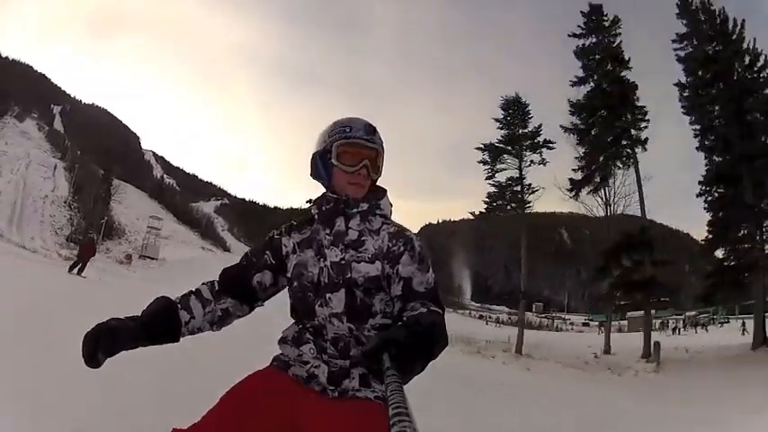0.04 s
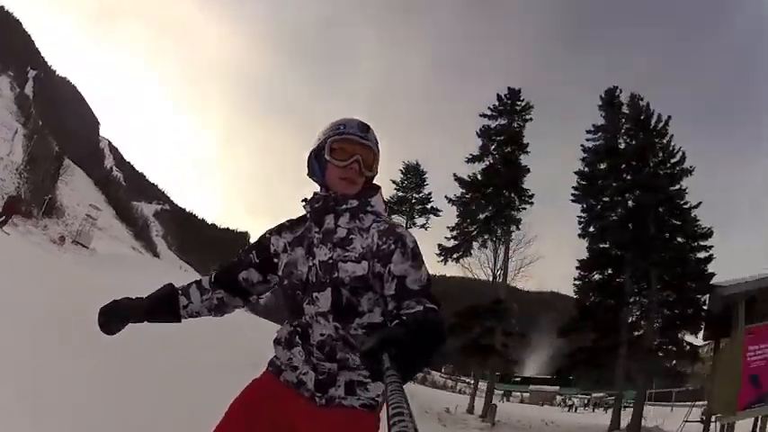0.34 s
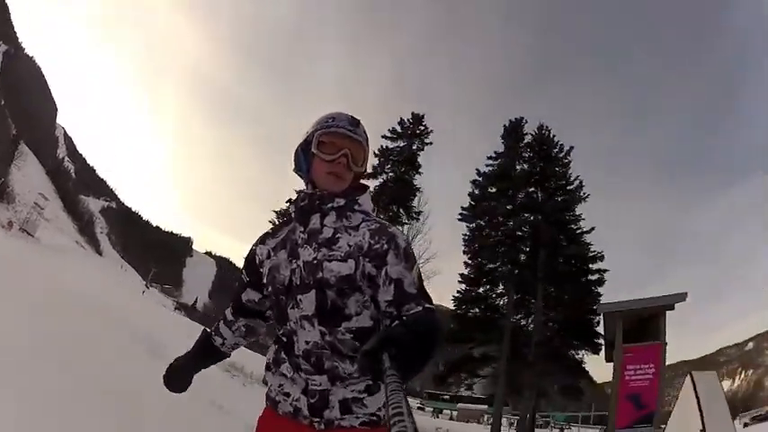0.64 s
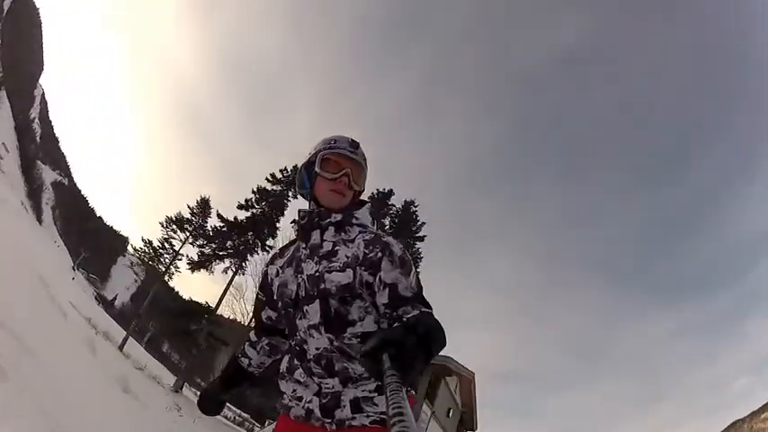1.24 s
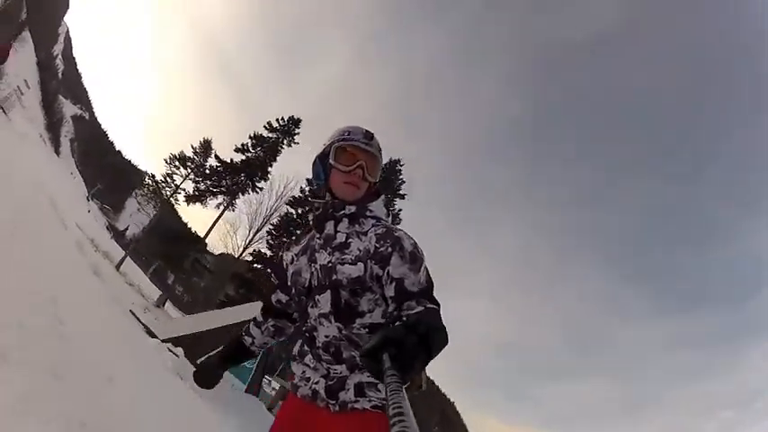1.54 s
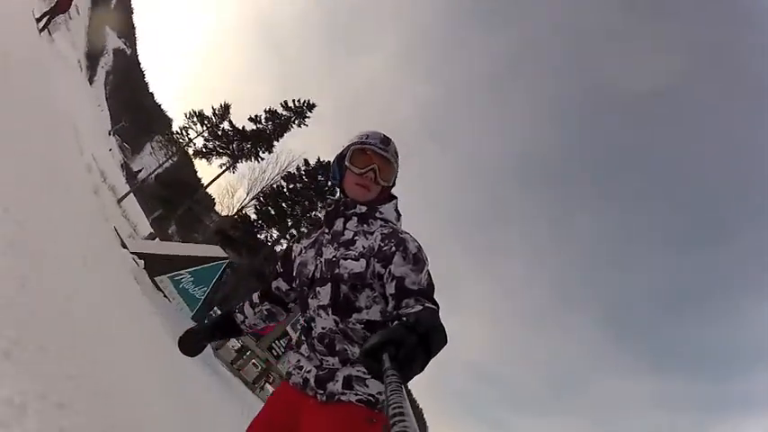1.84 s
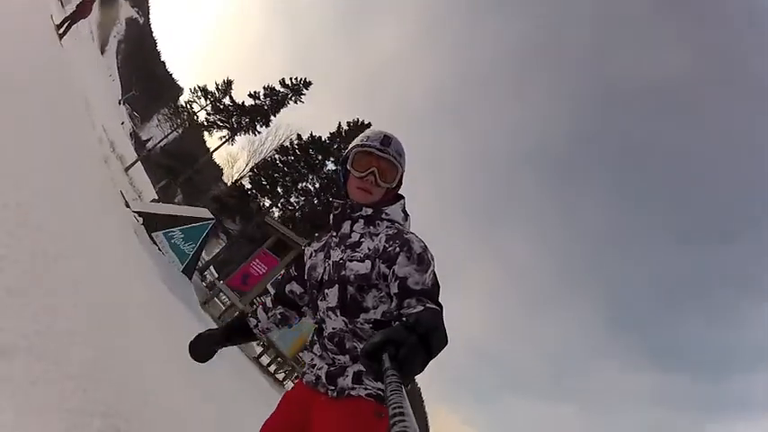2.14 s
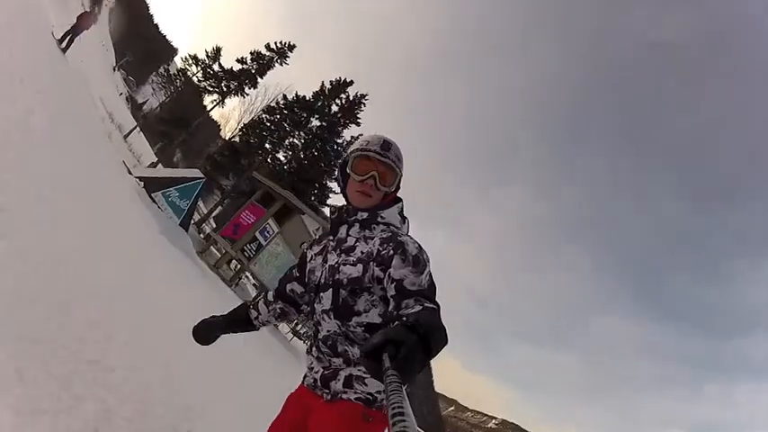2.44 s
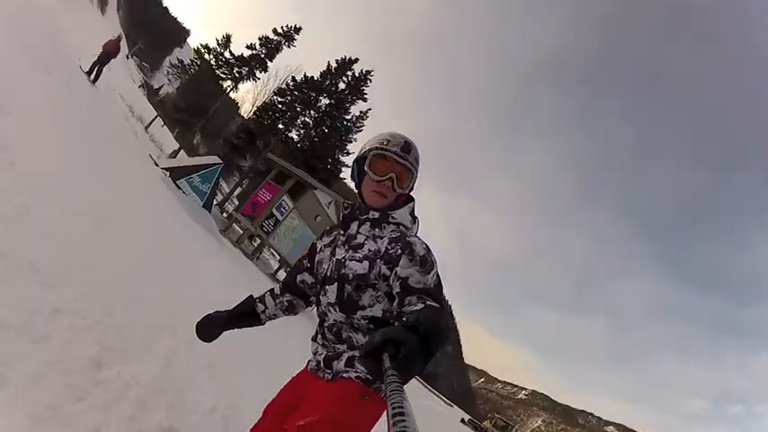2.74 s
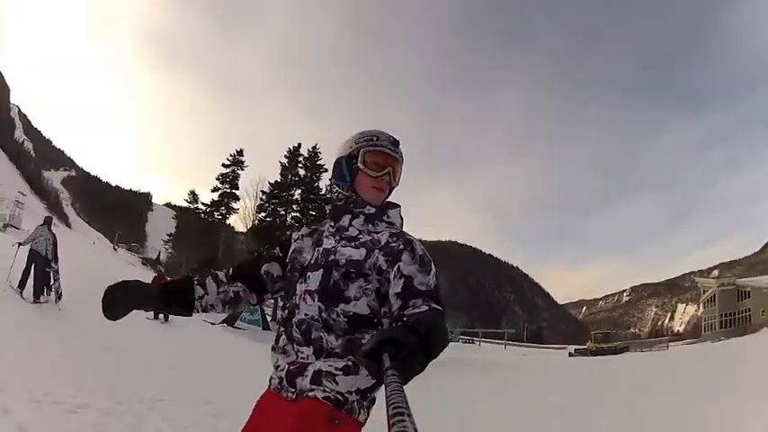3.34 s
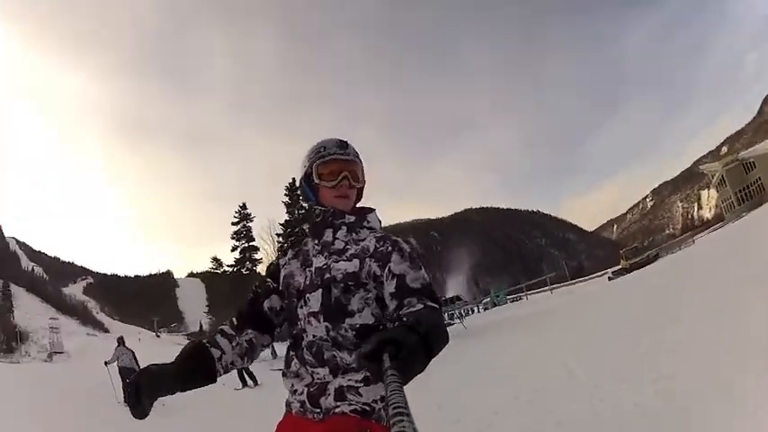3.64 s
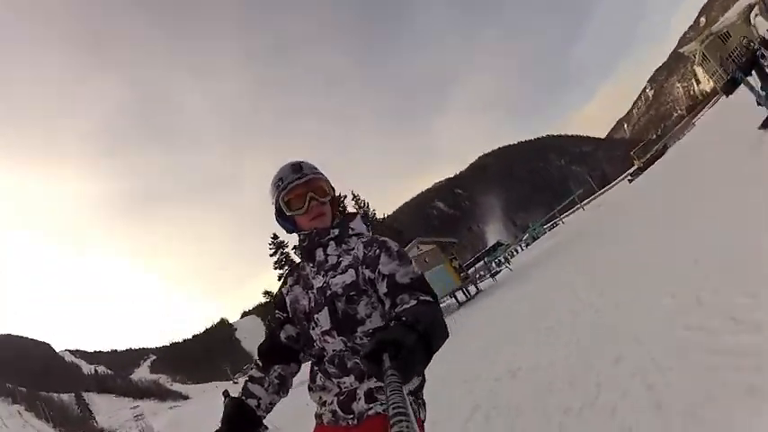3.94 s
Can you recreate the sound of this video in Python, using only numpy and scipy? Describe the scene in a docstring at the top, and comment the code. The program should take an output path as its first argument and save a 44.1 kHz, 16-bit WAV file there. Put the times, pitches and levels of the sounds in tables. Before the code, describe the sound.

Skis on an open snowy slope bite into a short turn, bump, then slide more and more quietly with crackles and ticks. The close microphone sounds boxed in and picks up low wind gusts and a brief hum.

```python
"""An open slope of packed snow. Skis scrape through a turn, then glide on, slowing and ticking over
small lumps; their crunch and hiss are tiny cracks of snow crystals over friction noise.
The camera rides on a hand-held pole in a closed plastic case whose resonances colour the snow.
Rushing air makes the pole hum in a few swells and buffets the case, over a faint steady wash."""
import sys
import numpy as np
from scipy import signal
from scipy.fft import rfft, irfft, next_fast_len
from scipy.io import wavfile
from scipy.ndimage import map_coordinates

SR = 44100
rng = np.random.default_rng(int(sys.argv[2]) if len(sys.argv) > 2 else 0)


def store_pcm(level_fs):
    """Save levels as 16-bit WAV."""
    pcm = np.round(np.clip(level_fs, -1, 1) * 32767).astype(np.int16)
    wavfile.write(sys.argv[1], SR, np.atleast_2d(pcm).T)


N = 176400
T = np.arange(N) / SR
FFT_SIZE = next_fast_len(N + 8192, True)
HZ = np.fft.rfftfreq(FFT_SIZE, 1 / SR)

# Fader moves for the glide. Each row: time in seconds, crunch and hiss in relative dB.
GLIDE_FADERS = [(.3, -42.5, -65), (.38, -41, -48), (.5, -45.5, -51.5), (.6, -43, -50.5), (.7, -35.5, -43),
                (.76, -40, -48), (.87, -39, -48), (1.06, -39.5, -45.5), (1.15, -43.5, -50.5),
                (1.27, -43, -49.5), (1.35, -39.5, -47), (1.47, -43, -51.5), (2.15, -44, -50.5),
                (2.33, -47, -52.5), (2.52, -44, -51.5), (2.7, -45, -50.5), (2.82, -49, -54.5),
                (3.05, -49.5, -58.5), (3.45, -51, -54), (3.68, -49, -55.5), (3.73, -51.5, -56),
                (3.83, -49, -55.5), (4, -46.5, -55)]
# The skis' low rumble. Each row: time in seconds, level in relative dB.
RUMBLE_FADER = [(0, -36), (.1, -44), (.17, -37), (.22, -43.5), (.31, -44.5), (.36, -55), (.52, -55),
                (.63, -42), (.71, -34), (.76, -47.5), (.88, -38.5), (1, -47), (1.15, -45.5), (1.3, -43),
                (1.6, -47), (1.8, -49), (2.05, -47.5), (2.3, -50.5), (2.65, -50.5), (3, -56), (3.4, -60.5),
                (4, -55.5)]
# Thin, bright patches of hiss. Each row: start and end in seconds, level in relative dB,
# centre in Hz, width in octaves.
SIZZLE_PATCHES = [(2.797, 3.703, -56, 5700, 0.35), (3.76, 4.2, -54, 4190, 0.13),
                  (3.76, 4.2, -59.5, 7800, 0.077)]
# Lumps under the skis. Each row: start in seconds, level in relative dB, decay in seconds,
# brightness in dB per octave.
LUMPS = [(0.058, -25.5, .005, -6), (.094, -29, 0.0088, -4), (0.108, -25, 0.013, 2),
         (.132, -23.5, 0.0071, 3), (0.197, -23, .008, 5.5), (0.383, -41, 0.0032, -2), (0.398, -35, .005, 0),
         (0.636, -36, 0.0077, -1), (0.66, -41, 0.0053, -7), (0.687, -22, 0.0063, -2.5),
         (.703, -28.5, 0.019, -1), (1.331, -30.5, 0.0056, -1.5), (1.341, -34, 0.009, -6),
         (1.398, -38.5, .012, 1), (1.70, -40, .012, -5), (1.958, -33, 0.0041, -10.5),
         (2.026, -39, 0.013, 0.5), (2.107, -34, 0.007, -5), (2.154, -35, .006, -3),
         (2.653, -38, 0.019, 0.5), (2.688, -38.5, .012, -3), (2.926, -37.5, 0.0062, 1),
         (2.983, -38, 0.0054, 2), (3.094, -31.5, 0.0047, 3.5), (3.153, -33, 0.0067, 3.5),
         (3.279, -37, 0.0065, 1), (3.405, -37, 0.0045, 1.5), (3.442, -36, 0.0056, -3),
         (3.807, -38.5, 0.016, -4), (3.86, -35.5, 0.0056, 1.5), (3.922, -39, 0.01, 1)]
# Knocks on firm ground. Each row: start in seconds, level in dB, pitch in Hz.
KNOCKS = [(.155, -25.5, 320), (.703, -23, 160), (.707, -28, 246)]
# Air on the case, then air on the pole. Each row: time in seconds, level in relative dB.
WIND_FADER = [(0, -44.5), (.6, -41.5), (.75, -47), (.9, -47), (1.2, -43), (1.35, -40.5), (1.47, -45),
              (1.54, -35), (1.62, -44.5), (1.8, -43), (1.87, -39), (1.95, -45), (2.2, -41), (2.37, -45),
              (2.55, -47), (2.8, -48.5), (3.15, -46.5), (3.3, -50), (3.58, -54), (3.64, -40), (3.7, -50),
              (4, -53)]
DRONE_FADER = [(0, -35), (.15, -45), (.25, -35), (.35, -41), (.6, -38), (.72, -31), (.9, -37), (1.1, -45),
               (1.4, -43), (1.55, -43), (1.68, -52), (1.9, -38), (2.1, -52), (2.4, -56), (2.65, -49),
               (3.1, -49), (3.45, -51), (3.63, -43.5), (3.75, -51), (4, -46)]
# Clear hums of the pole. Each row: centre and length in seconds, level in dB, pitch in Hz.
HUM_SWELLS = [(0.292, 0.076, -27, 93), (0.379, 0.096, -22.5, 95.6), (0.49, 0.111, -22.5, 92.5),
              (0.564, 0.034, -31, 96), (0.787, 0.16, -31.5, 89)]
# The snow's colours outside the case. Each row: frequency in Hz, gain in dB.
SCRAPE_EQ = [(200, -7.5), (700, -2), (1000, -3.5), (1260, 2.5), (1500, -6), (1900, -0.5), (2300, 2.5),
             (2560, 4.5), (2850, 0.5), (3200, 7), (3600, 2.5), (4600, 4.5), (9000, 2), (15000, 2)]
CRUNCH_EQ = [(200, 0), (1300, 0), (2400, -1), (3500, -4.5), (4800, -13), (8000, -16.5), (15000, -1)]
HISS_EQ = [(500, -19.5), (2000, -15), (3500, 0), (5200, -1), (7000, -1), (9500, -1.5), (15000, -4)]
LUMP_EQ = [(300, -2), (700, -3.5), (1300, 1.5), (2400, -1), (3600, -1.5), (5200, 2.5), (7000, 0.5),
           (9000, -6.5), (15000, -7)]
# The colours of the low noise beds. Each row: frequency in Hz, gain in dB.
RUMBLE_EQ = [(80, -22.5), (170, -8), (280, -0.5), (350, -2), (470, -9), (700, -28), (1500, -38)]
WIND_EQ = [(10, -12), (25, -10), (42, 4.5), (60, 1.5), (90, -8.5), (160, -19.5), (400, -46)]
DRONE_EQ = [(40, -29), (70, -17), (88, -3.5), (102, -4), (120, -17), (160, -22), (400, -65)]
SLOPE_EQ = [(100, 4.5), (200, 2.5), (450, -5), (850, -5), (1400, -8.5), (3000, -15), (8000, -34)]
# Where the case rings. Each row: centre and width in Hz, gain in dB.
CASE_RESONANCES = [(1309.5, 156, 1), (1558, 540, -7.5), (2355, 230, -6), (2684, 310, -9.5),
                   (3540, 340, -6.5), (4320, 890, -20), (5330, 660, -14), (6633, 490, -15),
                   (7350, 530, -21), (8500, 570, -12.5), (9560, 500, -16), (10600, 330, -16),
                   (13400, 300, -19), (14400, 1000, -21)]
# Gaps between those resonances. Each row: centre and width in Hz, depth in dB.
CASE_GAPS = [(3010, 79, 3.5), (4425, 170, 7.5), (5980, 284, 11.5), (7460, 160, 6.5), (8840, 130, 6),
             (11300, 270, 7), (12650, 300, 7)]
# What leaks through the case's wall. Each row: frequency in Hz, gain in dB.
WALL_EQ = [(100, -49), (300, -12.5), (600, -14), (900, -14.5), (2000, -13), (4500, -23), (6000, -48),
           (12000, -44.5), (15500, -41)]


def edge_scrape(case):
    """The edges bite at the end of the turn, then let go."""
    bite_db = np.interp(T, [0, 0.17], [-2, 0])
    release_db = -175 * np.maximum(T - 0.24, 0)
    grip = judder(slow_db=0.96, fast_db=1.37, slow_rate=63.3, fast_rate=190)
    grit = snow(case * tone(SCRAPE_EQ), grain_db=-3, spread_db=5.5)
    return amp(-27.5 + bite_db + release_db) * grip * grit


def glide(case):
    """The flat skis crunch, hiss and rumble over the same uneven snow."""
    crunch_db, hiss_db = curves(GLIDE_FADERS)
    rumble_db, = curves(RUMBLE_FADER)
    contact = judder(slow_db=0.67, fast_db=1.34, slow_rate=24, fast_rate=140)
    crunch = amp(crunch_db - 0.5) * snow(case * tone(CRUNCH_EQ), grain_db=1.5, spread_db=5)
    hiss = amp(hiss_db + 1.5) * snow(case * tone(HISS_EQ), grain_db=-1, spread_db=3.5)
    for start, end, db, hz, octaves in SIZZLE_PATCHES:
        progress = np.clip((T - start) / (end - start), 0, 1)
        swell = np.sqrt(np.abs(np.sin(np.pi * progress)))
        band = np.exp(-.5 * (np.log2((HZ + 1) / hz) / octaves) ** 2)
        hiss += amp(db) * swell * snow(case * band, grain_db=4.5, spread_db=8)
    crackle = crumbs()
    rumble = amp(rumble_db) * rush(RUMBLE_EQ)
    return contact * (crackle * (crunch + hiss) + rumble)


def snow(colour, grain_db, spread_db, grains_per_s=2500):
    """Snow crystals break: tiny cracks of scattered size over smooth friction noise."""
    cracks = (rng.random(N) < grains_per_s / SR) * rng.choice([-1, 1], N)
    sizes = amp(spread_db * np.minimum(rng.standard_normal(N), 2))
    friction = rng.standard_normal(N)
    return unit(coloured(amp(grain_db) * unit(cracks * sizes) + friction, colour))


def judder(slow_db, fast_db, slow_rate, fast_rate):
    """Uneven contact between ski and snow flutters the level: a gain of rms 1."""
    return unit(amp(slow_db * wobble(slow_rate) + fast_db * wobble(fast_rate)))


def crumbs(ticks_per_s=60, decay_s=0.0017):
    """Icy crumbs catch under the skis: a gain with brief, sharp spikes."""
    hits = (rng.random(N) < ticks_per_s / SR) * rng.uniform(0.42, 1, N)
    ticks = signal.lfilter([1], [1, -np.exp(-1 / (decay_s * SR))], hits)
    return unit(np.hypot(1, amp(-9) * unit(ticks)))


def lumps(case, attack_s=0.0007):
    """Each lump gives a short burst of crushed snow that rings the case."""
    out = np.zeros(N)
    t = np.arange(SR // 16) / SR
    hz = np.fft.rfftfreq(len(t), 1 / SR)
    colour = case * tone(LUMP_EQ)
    burst_colour = np.interp(hz, HZ, colour)
    for start_s, db, decay_s, brightness in LUMPS:
        tilt = amp(brightness * np.log2(np.clip(hz, 500, 6000)))
        burst = irfft(rfft(rng.standard_normal(len(t))) * tilt, len(t))
        burst /= np.sqrt(np.mean((tilt * burst_colour) ** 2))  # make-up gain for both filters
        burst *= amp(db - 2) * (1 - np.exp(-t / attack_s)) * np.exp(-(t / decay_s) ** 2)
        start = round(start_s * SR)
        out[start:start + len(t)] += burst[:N - start]
    return coloured(out, colour)


def thuds(attack_s=0.0016, t60_s=0.08):
    """A hard knock makes the skis ring briefly and low."""
    out = np.zeros(N)
    for start_s, db, hz in KNOCKS:
        t = np.maximum(T - start_s, 0)
        envelope = amp(db - 60 * t / t60_s) * (1 - np.exp(-t / attack_s))
        out += envelope * np.sin(2 * np.pi * hz * t)
    return out


def case_buffeting():
    """Air buffets the case with deep gusts."""
    wind_db, = curves(WIND_FADER)
    return amp(wind_db + 0.5) * rush(WIND_EQ)


def pole_hum(wander_hz=1.3):
    """Air drives the pole's low resonance: a breathy drone that swells at times into a clear hum."""
    drone_db, = curves(DRONE_FADER)
    out = amp(drone_db) * rush(DRONE_EQ)
    drift_cycles = np.cumsum(wander_hz * wobble(15.4)) / SR
    for centre_s, length_s, db, hz in HUM_SWELLS:
        swell = np.cos(np.pi * np.clip((T - centre_s) / length_s, -.5, .5)) ** 1.1
        cycles = hz * T + drift_cycles + rng.random()
        out += amp(db) * swell * np.sqrt(2) * np.sin(2 * np.pi * cycles)
    return out


def slope_wash():
    """The open slope lays a faint, steady bed under everything."""
    return amp(-58.5) * rush(SLOPE_EQ)


def case_colour(steepness=1.51):
    """The case passes sound mostly at its resonances, with deep gaps between them."""
    power = sum(amp(db) ** 2 / (1 + (2 * (HZ - hz) / width) ** 2) ** steepness
                for hz, width, db in CASE_RESONANCES)
    gaps_db = sum(depth * np.exp(-((HZ - hz) / width) ** 2) for hz, width, depth in CASE_GAPS)
    return np.sqrt(power + tone(WALL_EQ) ** 2) * amp(-gaps_db)


def amp(db):
    """Decibels to gain."""
    return 10 ** (np.asarray(db) / 20)


def unit(x):
    """Scaled to rms 1."""
    return x / np.sqrt(np.mean(x ** 2) + 1e-20)


def tone(eq):
    """Gain at each frequency, joining the EQ points on a log axis."""
    hz, db = np.transpose(eq)
    return amp(np.interp(np.log(HZ + 1), np.log(hz + 1), db))


def curves(rows):
    """One fader curve for each column after the time."""
    times, *faders = np.transpose(rows)
    return [np.interp(T, times, fader) for fader in faders]


def wobble(rate):
    """A smooth random curve, rate knots a second."""
    return map_coordinates(rng.standard_normal(4096), [T * rate], mode="wrap")


def coloured(x, gain):
    """A minimum-phase EQ, so the ringing follows each hit."""
    cepstrum = irfft(np.log(np.maximum(gain, 1e-6)), FFT_SIZE)
    cepstrum[1:FFT_SIZE // 2] *= 2
    cepstrum[FFT_SIZE // 2 + 1:] = 0
    return irfft(rfft(x, FFT_SIZE) * np.exp(rfft(cepstrum)), FFT_SIZE)[:N]


def rush(eq):
    """Noise of rms 1 shaped by this EQ."""
    return unit(coloured(rng.standard_normal(N), tone(eq)))


def scene():
    """Snow and air as heard inside the case, in mono."""
    case = case_colour()
    skis = edge_scrape(case) + glide(case) + lumps(case) + thuds()
    return (skis + case_buffeting() + pole_hum() + slope_wash())[None]


def record(dry):
    """The camera cuts the top end above its band limit."""
    top_hz = 15400
    return irfft(rfft(dry, FFT_SIZE) * (HZ < top_hz), FFT_SIZE)[:, :N]


dry = scene()
out = record(dry)
store_pcm(out)
```